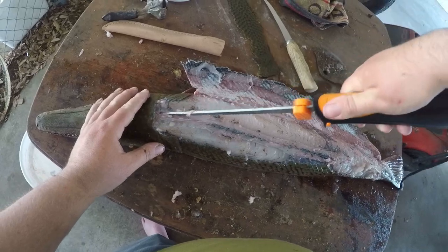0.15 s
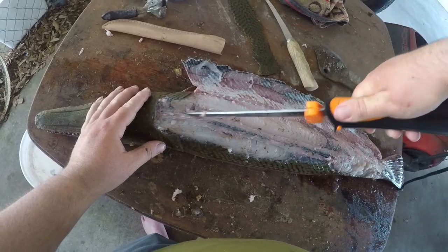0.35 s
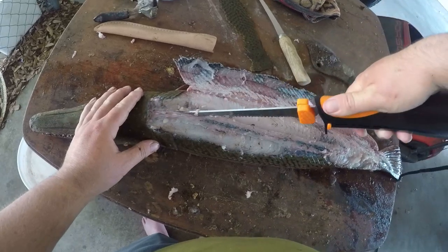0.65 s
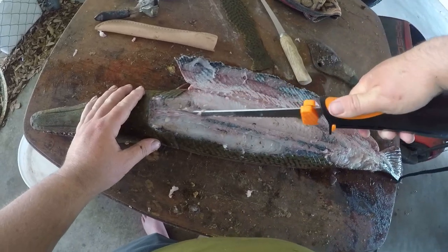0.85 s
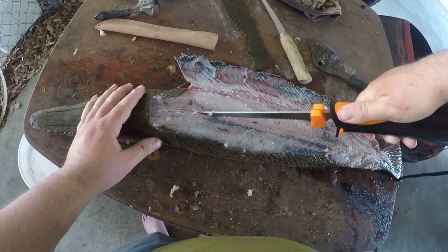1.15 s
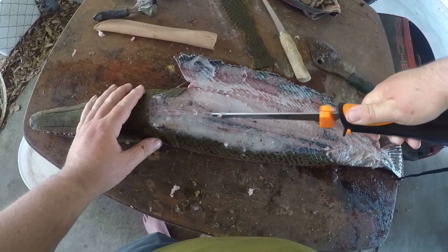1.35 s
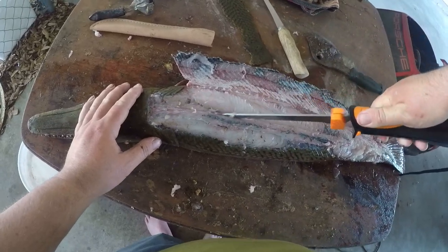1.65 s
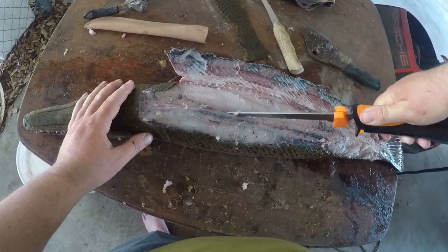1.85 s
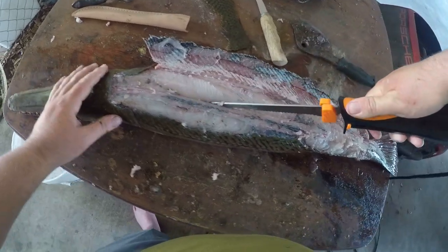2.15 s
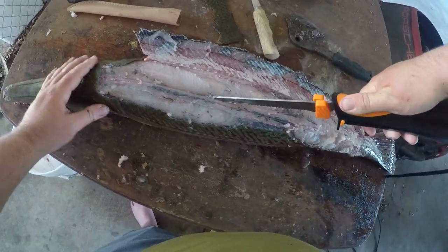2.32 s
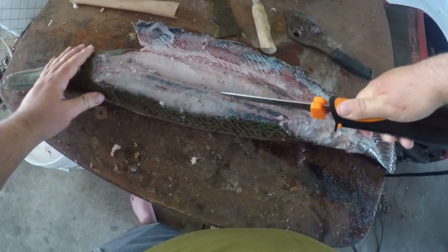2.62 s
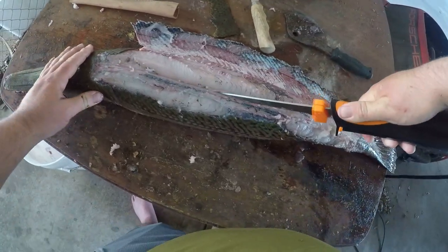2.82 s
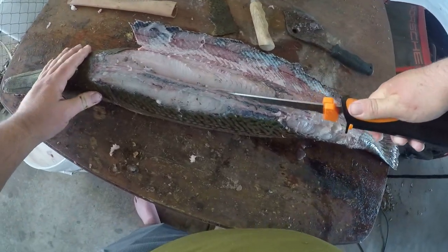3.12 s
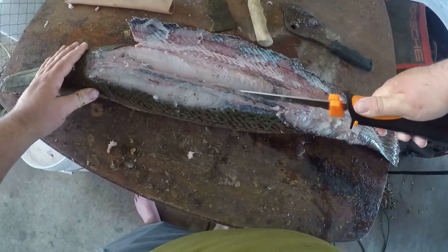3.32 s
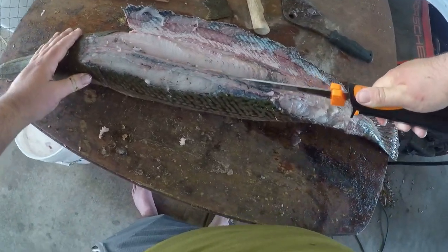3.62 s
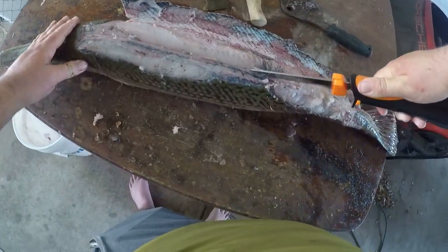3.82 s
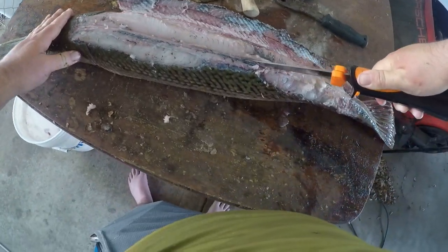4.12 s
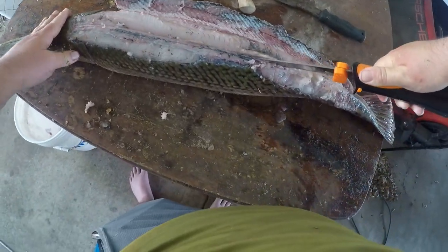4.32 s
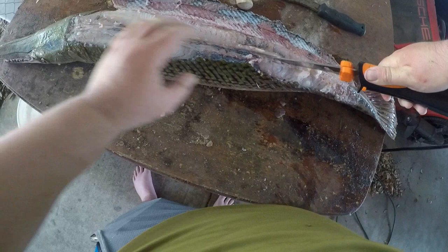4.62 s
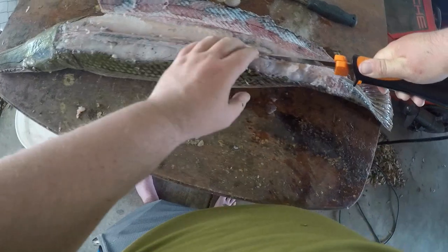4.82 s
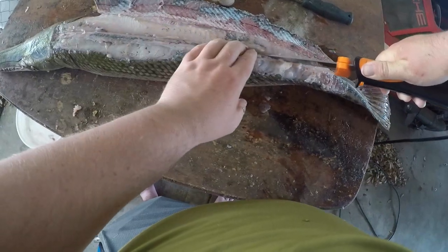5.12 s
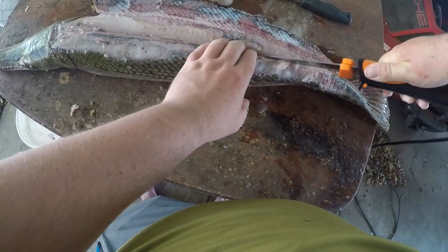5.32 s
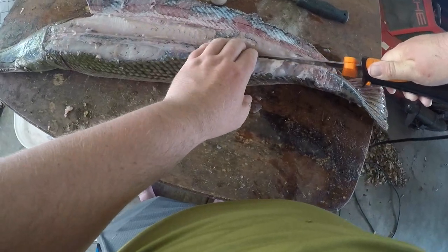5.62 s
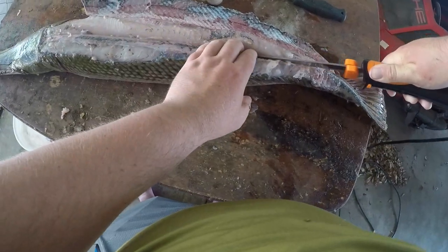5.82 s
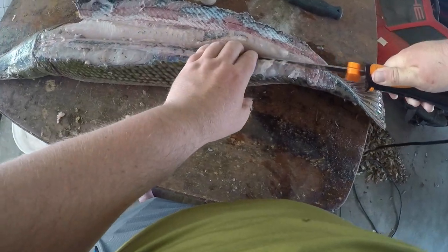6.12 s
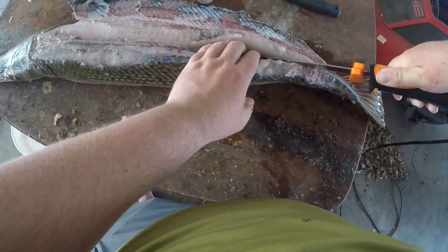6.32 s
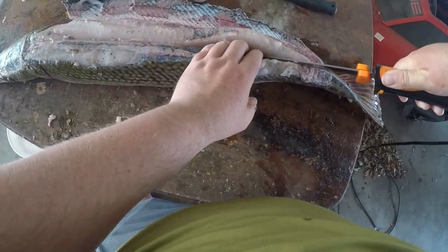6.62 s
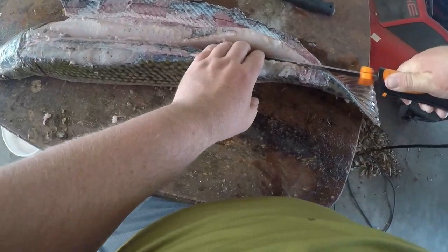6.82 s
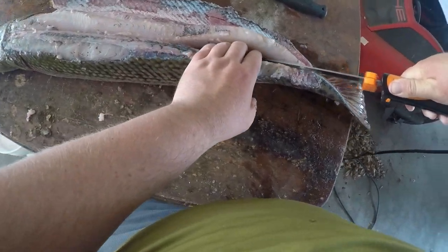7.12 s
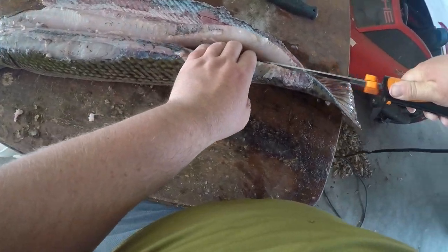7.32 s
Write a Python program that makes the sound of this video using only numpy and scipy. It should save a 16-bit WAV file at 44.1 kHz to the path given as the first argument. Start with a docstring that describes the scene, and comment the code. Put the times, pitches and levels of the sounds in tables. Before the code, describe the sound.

An electric knife is already running close to a stereo microphone: a rapid metallic chatter and bright rasp, a hollow buzzing handle, thin motor whine and low, throbbing rumble. At about 0.45 s the motor eases off; the buzz drops and loosens into separate knocks, one stronger at 0.54 s, with short high squeaks at 0.66 and 0.71 s. A sharp click at 0.79 s restarts it, with a quick rough upward chirp. It runs steadily until about 2.0 s, then winds down further, squeaking between 2.3 and 2.4 s before a louder snap at 2.45 s and a straining gear chirp. From 2.6 s it hums without a break, the blade ring growing thicker and slightly higher as flesh grips it. From about 5 s pressure deepens the low throb; faint wet ticks peak near 6.5 s, and the speed sags slightly while sawing continues to the end.

```python
"""Electric fillet knife, close

A large fish on a table, an electric knife sawing along it, stereo microphone ports of a camera close by.
A crank shuttles two serrated blades: steel clashes and rasps, the drive knocks and the motor whines.
The handle sways over a low rumble. Twice the motor runs down, the slow blades squeak and a click restarts it.
Impulses timed by the crank ring resonances; its harmonics give buzz and whine, shaped noise gives the rest."""
import sys
import numpy as np
from scipy import signal
from scipy.fft import rfft, irfft
from scipy.io import wavfile
from scipy.ndimage import uniform_filter1d

SR = 44100
rng = np.random.default_rng(int(sys.argv[2]) if len(sys.argv) > 2 else 0)


def transcribe(signal):
    """Save signal, clipped to [-1, 1], as a 16-bit WAV file at the path in sys.argv[1]."""
    frames = np.atleast_2d(signal).T
    limited = np.clip(frames, -1, 1)
    pcm = np.round(limited * 32767).astype(np.int16)
    wavfile.write(sys.argv[1], SR, pcm)


N = 328633
TIME = np.arange(N) / SR
BINS = np.fft.rfftfreq(N, 1 / SR)

# Speed that the motor holds under its load: t/s, crank rate/(turns/s)
RUNNING_SPEED = [(0, 28.48), (.5, 30.02), (1.25, 29.45), (1.6, 29.95), (2.06, 31.19), (2.9, 29.64),
                 (3.3, 29.94), (4.1, 29.15), (5.1, 29.1), (5.5, 28.99), (5.9, 29.04), (6.7, 28.43),
                 (7.45, 28.27)]
# Trigger let go: eased off t/s, pulled again t/s, run-down time/s, steepness of run-down, run-up time/s
PAUSES = [(.452, .7935, .225, 1.163, .121), (1.981, 2.42, .332, 2.782, .117)]
# Drag of the flesh on the blades: t/s, drag/(0-1)
DRAG = [(0, 0.16), (.9, 0.13), (2.2, 0.14), (2.6, 0.05), (2.95, 0.26), (3.6, 0.45), (4.4, 0.82),
        (7.45, 0.9)]
# Free hand pressing on the fillet above the blades: t/s, pressure/(0-1)
PRESS = [(4.5, 0), (5.0, 0.9), (6.2, 1), (6.6, 0.97), (7.3, 0.1)]
# Blades binding before each restart: t/s, gain of rubbing and knocking/dB
BINDING = [(.64, 0), (.7, -3), (.735, -3), (.745, -8), (.791, -8), (.7936, 0), (2.39, 0), (2.415, -4),
           (2.435, -3), (2.45, 0)]

# Blade against blade: place in the turn/(0-1), strength running light, strength deep in the flesh
CLASHES = [(.03, .03, .14), (.18, .3, .42), (.3, .6, .4), (.345, .25, .3), (.505, .2, .23),
           (.695, .33, .34), (.89, .33, .27)]
# Colour of the steel: f/Hz, relative level/dB
STEEL_COLOUR = [(590, -26.5), (1000, -1), (1160, -7), (1410, 1), (1730, -6.5), (1990, -5), (2710, -8),
                (3610, -2), (4010, -4), (4920, -4), (6120, 1), (7530, -3), (9040, -12), (14000, -22),
                (15500, -113)]
# Blade resonances, damped in the flesh: f/Hz, width/Hz, boost running light/dB, boost gripped/dB
STEEL_MODES = [(2420, 740, 7, 1), (3090, 460, 4, 3.5), (6630, 920, 3.5, 1.5), (7580, 580, 5, 5.5)]
# Reversals bending the blades, most on the push: place in the turn/(0-1), signed strength
FLEXES = [(.16, 0.32), (.67, -0.56)]
# Ring of the flat of the blade at full speed, before torque: t/s, low ring level/dB, high ring level/dB
RINGS = [(0, -52, -35), (.5, -52, -33), (1.3, -67, -40), (2.1, -47, -39), (2.95, -35, -58),
         (4.4, -30.5, -34.5), (5.1, -31, -29.5), (6.1, -33.5, -38.5), (7.3, -38, -30)]

# Knocks in the drive: place in the turn/(0-1), signed strength
KNOCKS = [(.21, 0.05), (0.73, -0.17)]
# Drag at which the blades run light, cut, and are gripped: drag/(0-1)
BUZZ_DRAG = [.08, .3, .88]
# Buzz of the drive: multiple of the crank rate, then relative level/dB running light, cutting, gripped
BUZZ = [(3, -44, -50, -55), (4, -34.5, -41, -36.5), (5, -39, -41, -34.5), (6, -36, -43.5, -46),
        (7, -46.5, -43.5, -35), (8, -38.5, -36, -42.0), (9, -59, -39.5, -41), (10, -40.5, -43, -45.5),
        (11, -45, -43.5, -38), (12, -45, -39, -45.5), (13, -60, -38, -43), (14, -35, -41, -40.5),
        (15, -44, -41, -38), (16, -39.5, -53, -59), (17, -46, -45.5, -42), (18, -49, -53, -54),
        (19, -47.5, -39, -42.5), (20, -43, -47, -48), (21, -46, -44.0, -42.5), (22, -44, -54, -46),
        (23, -48, -51.5, -49), (24, -48, -56, -50)]
# Colour of the housing: f/Hz, relative level/dB
HOUSING_COLOUR = [(60, -26), (100, -1), (170, -10), (330, -2.5), (450, -2), (650, -5), (850, 0),
                  (1050, -7.5), (1400, -8.5), (1750, -15), (2400, -5.5), (3200, -15), (4500, -51)]
# Housing resonances: f/Hz, width/Hz, boost/dB
HOUSING_MODES = [(100.86, 4, 12.5), (823, 62, 6)]
# Slow rise and fall of the housing level: t/s, trim/dB
HOUSING_LEVEL = [(0, 0.5), (1.8, 0), (2.9, 2), (3.8, 0.5), (6.2, 0.2), (7.4, -1.5)]

# Yoke striking the hollow shell at both ends of its travel: place in the turn/(0-1), strength
YOKE = [(.2, 1), (.7, .5)]
# Ring of the shell at full speed: t/s, level/dB
SHELL_LEVEL = [(0, -27.5), (.5, -32), (1.05, -28.5), (1.7, -36), (2.15, -32), (2.7, -29.5), (3.5, -36),
               (4.6, -32.5), (7.3, -34)]

# Motor and gear lines at full power and speed: multiple of the crank rate, level/dB
WHINE = [(3.45, -53), (62.5, -57), (66.67, -40.5), (70.83, -43.5), (133.33, -45), (258.33, -47),
         (266.67, -41)]
# Gearbox resonances that the straining motor sweeps through: f/Hz, width/Hz, relative level/dB
GEARBOX = [(1500, 200, -26.5), (2420, 200, -35), (3240, 290, -26)]

# Squeaks of slow blades and straining gears: t/s, length/s, level/dB, first f/Hz, last f/Hz, width/Hz
SQUEAKS = [(0.656, 0.012, -29, 8000, 6300, 1200), (0.711, 0.024, -26, 7640, 6660, 1100),
           (.807, 0.024, -38, 7000, 6700, 1200), (2.303, 0.012, -26, 7650, 6600, 1200),
           (2.347, 0.017, -25, 7500, 6200, 1200), (2.39, 0.03, -37, 10000, 10400, 1300),
           (2.412, 0.019, -20.5, 7350, 6760, 1090), (2.502, 0.022, -19.5, 2440, 2560, 130)]
# Drive snapping into gear on each restart: t/s, level at onset/dB
STARTS = [(0.7936, -16), (2.4522, -14)]
# Chirps and snaps deep in the tail: t/s, level/dB
TEARING = [(5.0, -51), (5.8, -44), (6.5, -36.5), (7.45, -48)]

# Sway of the handle at full speed, before torque: t/s, level/dB
SWAY = [(0, -16.5), (.55, -14), (1.0, -8), (1.3, -18), (2.85, -15.5), (3.2, -22), (5.1, -21.5),
        (6.15, -27.5), (7.1, -23)]
# Colour of the low rumble: f/Hz, relative level/dB
RUMBLE_COLOUR = [(10, -12.5), (20, 2), (45, 2), (100, -6), (150, -12.5), (300, -18.5), (1000, -50),
                 (15000, -53)]

# Level difference of the two ports: f/Hz, left minus right/dB
PORT_BALANCE = [(60, -1), (200, -1), (480, -4.5), (770, -13.5), (1170, -7), (1800, 3.5), (2750, -1),
                (4200, -3.5), (6400, 1.5), (9800, -3), (15000, 2)]
# Phase between the ports: f/Hz, lead of the left/rad
PORT_PHASE = [(500, 0), (750, -1.2), (950, -3.6), (1400, -4.9), (2100, -6.3)]
# Likeness of noise at the two ports: f/Hz, correlation/(0-1)
LIKENESS = [(30, .1), (130, .55), (300, .93), (1500, .8), (3000, .7), (6000, .5), (9000, .2), (15000, .05)]

REBOUND, REBOUND_TURNS = .85, .13  # strength relative to the knock, delay in turns
SHELL_HZ, SHELL_WIDTH_HZ = 831.5, 148
# one early knock of the drive during the first run-down rings the housing
KNOCK_S, KNOCK_DB, KNOCK_DECAY_S, KNOCK_HZ = .537, -14, 0.0072, 850
UNLOADING = .3  # share of the torque that drops off the gears while they hang slack
TAKE_UP_S = 0.0018  # time for the gears to take up the torque
EDGE_HZ = 15300  # upper band limit


def amp(db):
    """Decibels to gain."""
    return 10 ** (np.asarray(db) / 20)


def curve(rows, column=1):
    """One column of a time table, at every sample."""
    rows = np.asarray(rows)
    return np.interp(TIME, rows[:, 0], rows[:, column])


def read(points, hz):
    """A spectrum table on a log-frequency axis."""
    f, value = np.transpose(points)
    return np.interp(np.log(hz + 1), np.log(f + 1), value)


def evened(x, size=N):
    """Scales to rms 1 over a sliding window of size samples."""
    power = np.atleast_2d(x ** 2).mean(0)
    return x / np.sqrt(abs(uniform_filter1d(power, size)) + 1e-14)


def wander(rate_hz):
    """Random wander of rms 1, mostly slower than rate_hz."""
    spectrum = rfft(rng.standard_normal(N)) / (1 + (BINS / rate_hz) ** 4)
    return evened(irfft(spectrum, N))


def noise_pair():
    """White noise at two ports, as alike as the likeness table says."""
    a, b = rfft(rng.standard_normal((2, N)))
    same = np.clip(read(LIKENESS, BINS), -1, 1)
    return irfft(np.array([a, same * a + np.sqrt(1 - same ** 2) * b]), N)


def body(x, spectrum, modes, size=8192):
    """Causal filter with a broad colour and a few resonances on top."""
    hz = abs(np.fft.fftfreq(size, 1 / SR))
    peaks = sum(boost / (1 + (2 * (hz - f) / width) ** 2) for f, width, boost in modes)
    log_gain = np.log(amp(np.maximum(read(spectrum, hz) + peaks, -100)))
    # minimum phase: the ring starts at once
    ring = np.fft.ifft(np.exp(np.conj(signal.hilbert(log_gain)))).real[:size // 2]
    return signal.oaconvolve(np.atleast_2d(x), ring[None], axes=1)[:, :N]


def resonate(x, hz, width):
    """A resonance of about unit gain at its peak, fixed or moving."""
    turn = np.exp(2j * np.pi * np.cumsum(hz * np.ones(x.shape[-1])) / SR)
    r = np.exp(-np.pi * abs(width) / SR)
    return 2 * (turn * signal.lfilter([1 - r], [1, -r], x / turn)).real


def resonate_twice(x, hz, width):
    """Two equal resonances in a row, for steeper skirts."""
    return resonate(resonate(x, hz, width), hz, width)


def fading(x, life):
    """Each impulse dies away exponentially, with time constant life in seconds."""
    return signal.lfilter([1], [1, -np.exp(-1 / (abs(life) * SR))], x)


def add(mix, s, sound):
    """Mixes a sound in at time s."""
    part = mix[:, round(s * SR):][:, :sound.shape[-1]]
    part += sound[..., :part.shape[1]]


def blows(turns, places, spread_db, jitter):
    """Impulses at fixed places in each crank turn, uneven in size (dB) and time (s)."""
    out, whole = np.zeros(N), np.arange(np.floor(turns[-1]) + 1)
    for place, strength in places:
        size, late = rng.standard_normal((256, 2))[:len(whole)].T
        moment = np.interp(whole + place, turns, TIME, -1, -1) + jitter * late
        at = np.round(moment * SR).astype(int)
        inside = (at >= 0) & (at < N)
        out[at[inside]] += (strength * amp(spread_db * size))[inside]
    return out


def scatter(x, wet_db, life, size=1500):
    """Dense early reflections from the handle, hands and table."""
    t = np.arange(size) / SR
    taps = rng.standard_normal(size) * np.exp(-t / life) * (t > .001)
    return x + amp(wet_db) * signal.oaconvolve(x, taps / np.linalg.norm(taps))[:N]


def trigger():
    """Share of the running speed, and motor torque: the motor runs down in a pause, then pulls back up."""
    spin, torque = np.ones(N), np.zeros(N)
    for eased, pulled, run_down, steepness, run_up in PAUSES:
        coasted = np.clip(TIME - eased, 0, pulled - eased)
        driven = np.maximum(TIME - pulled, 0)
        lost = (1 - np.exp(-(coasted / run_down) ** steepness)) * np.exp(-driven / run_up)
        spin *= 1 - lost
        torque += lost * (1 - np.exp(-driven / TAKE_UP_S))
    slack = (TIME > KNOCK_S) & (TIME < STARTS[0][0])
    return spin, torque - UNLOADING * uniform_filter1d(slack * 1., size=200)


def level(db, speed_power, torque_db=0, drag_db=0, press_db=0):
    """Gain of a part: a power of the speed, plus so many dB at full torque, full drag and full hand pressure."""
    spin, torque = trigger()
    load_db = torque_db * torque + drag_db * curve(DRAG) + press_db * curve(PRESS)
    return spin ** speed_power * amp(db + load_db)


def sliding():
    """Gain of blade, drive and shell contact, which falls as the blades bind."""
    return amp(curve(BINDING))


def blades(turns):
    """Steel clashes on steel within each stroke, over a steady rasp of sliding teeth."""
    place, light, deep = np.transpose(CLASHES)
    free = blows(turns, zip(place, light), spread_db=1.2, jitter=.00008)
    gripped = blows(turns, zip(place, deep), spread_db=1.6, jitter=.00008)
    hits = free + np.clip(curve(DRAG), 0, 1) * (gripped - free)
    contact = fading(hits, life=.0014) * 1.2 + .28  # the constant is the rasp
    grit = amp(.9 * wander(400))
    push = noise_pair() * contact * grit + 1.6 * scatter(hits, wet_db=9, life=.002)
    ringing = body(push, STEEL_COLOUR, [(hz, width, db) for hz, width, db, _ in STEEL_MODES])
    damped = body(push, STEEL_COLOUR, [(hz, width, db) for hz, width, _, db in STEEL_MODES])
    clatter = ringing + curve(DRAG) * (damped - ringing)
    gain = level(db=-21.0, speed_power=1.14, torque_db=4.0, drag_db=-0.58, press_db=0.45)
    return evened(clatter, size=4400) * gain


def blade_rings(turns):
    """The reversals also ring two bending modes of the blades; the lower rises as the flesh grips."""
    hits = blows(turns, FLEXES, spread_db=1.1, jitter=.00002)
    scrape = evened(noise_pair() * (fading(abs(hits), life=.006) + .15))
    push = evened(scatter(hits, wet_db=-3.0, life=0.006)) + .55 * scrape
    low = resonate_twice(push, hz=1200 + 235 * curve(DRAG), width=200)
    high = resonate_twice(push, hz=3610, width=330)
    low_gain = level(db=curve(RINGS), speed_power=3.2, torque_db=18)
    high_gain = level(db=curve(RINGS, column=2), speed_power=5.2)
    return evened(low, size=4400) * low_gain + evened(high, size=4400) * high_gain


def drive(turns, speed):
    """Crank harmonics phased as a knock and rebound buzz with the drag, over single knocks and a noisy rattle."""
    drag = curve(DRAG)
    angle = 2 * np.pi * (turns - .22 + .001 * wander(20))
    wobbles = [amp(.7 * wander(3.9)) for _ in range(5)]
    buzz = np.zeros(N)
    for (multiple, *levels), lag in zip(BUZZ, rng.standard_normal(len(BUZZ))):
        k = round(multiple)
        rebound = np.angle(1 + REBOUND * np.exp(-2j * np.pi * k * REBOUND_TURNS))
        # odd harmonics in quadrature give a knock at both ends of the stroke
        partial = np.cos(k * angle + k % 2 * np.pi / 2 + rebound + .6 * lag)
        buzz += amp(np.interp(drag, BUZZ_DRAG, levels)) * wobbles[k % len(wobbles)] * partial
    # at low speed the buzz falls apart into single knocks on the housing
    tight = np.clip((speed - 21) / 6, 0, 1)
    hits = blows(turns, KNOCKS, spread_db=3.5, jitter=.00008)
    knocks = body(scatter(hits, wet_db=4.0, life=0.004), HOUSING_COLOUR, HOUSING_MODES)
    loose = evened(noise_pair() * (fading(abs(hits), life=.004) + .15))
    rattle = evened(body(loose, HOUSING_COLOUR, HOUSING_MODES), size=4400)
    tonal = evened(buzz) * tight + evened(knocks, size=4400) * np.sqrt(1 - tight ** 2)
    tonal_gain = level(db=-28.5, speed_power=1.36, torque_db=5, drag_db=0.6)
    rattle_gain = level(db=-29.0, speed_power=0.98, torque_db=6.5, drag_db=-2.5)
    return amp(curve(HOUSING_LEVEL)) * (tonal * tonal_gain + rattle * rattle_gain)


def shell(turns):
    """Each end of the stroke rings the shell of the handle at one fixed pitch, whatever the speed."""
    hits = blows(turns, YOKE, spread_db=.7, jitter=.00002)
    ring = resonate_twice(hits, SHELL_HZ, SHELL_WIDTH_HZ)
    return evened(ring) * level(db=curve(SHELL_LEVEL), speed_power=1.6)


def motor(turns, speed):
    """Commutator and gear lines waver while the power is on; each run-up strains the gears into a rough chirp."""
    gain_rate = uniform_filter1d(np.gradient(speed) * SR, 900)  # turns per second, each second
    power = np.clip(1 + gain_rate / 25, 0, 1) * (speed / speed.max()) ** 0.28
    lines = np.zeros(N)
    for k, db in WHINE:
        waver = 1 + 0.064 * wander(23)
        lines += amp(db) * waver * np.cos(2 * np.pi * k * turns + 0.33 * wander(2.1))
    mesh = sum(np.cos(2 * np.pi * k * turns + .85 * wander(150)) for k in (66.67, 133.33, 141.67))
    effort = np.clip(gain_rate / 90, 0, 1) ** 1.5 * np.clip(speed / 17, 0, 1) ** 4
    strain = mesh * effort * amp(3 * wander(60))
    chirp = sum(amp(db) * resonate_twice(strain, hz, width) for hz, width, db in GEARBOX)
    return np.sqrt(2) * (lines * power + chirp)


def stops():
    """Slow blades stick and squeak with a faint octave, restarts click; one early drive knock rings the housing."""
    out = np.zeros((2, N))
    for s, length, db, first_hz, last_hz, width in SQUEAKS:
        count = max(round(length * SR), 20)
        hz, rub = np.geomspace(first_hz, last_hz, count), rng.standard_normal((2, count))
        tone = evened(resonate_twice(rub, hz, width))
        octave = evened(resonate_twice(rub, 2 * hz, width))
        add(out, s, amp(db) * (tone + amp(-17) * octave) * signal.windows.tukey(count, .5))
    t = np.arange(SR // 20) / SR
    for s, db in STARTS:
        snap = evened(resonate(rng.standard_normal((2, len(t))), hz=6600, width=300))
        add(out, s, amp(db) * snap * np.exp(-t / 0.004))
    knock = np.sin(2 * np.pi * KNOCK_HZ * t)
    add(out, KNOCK_S, amp(KNOCK_DB) * knock * np.exp(-t / KNOCK_DECAY_S))
    return out


def tearing(turns):
    """Deep in the tail the blades give one thin chirp a turn, among tiny wet snaps of the flesh."""
    chirps = fading(blows(turns, [(.04, 1)], spread_db=4, jitter=.0006), life=.002)
    snaps = (rng.random(N) < 200 / SR) * rng.exponential(.35, N)  # about 200 a second
    ticks = noise_pair() * (chirps + fading(snaps, life=0.0042))
    return evened(resonate_twice(ticks, hz=10200, width=2000)) * amp(curve(TEARING))


def handle(turns):
    """The shuttling blades sway the handle twice a turn and rock it once a turn, harder when pressed down."""
    flutter = np.array([wander(8.8), wander(3.2)])
    sway_gain = level(db=curve(SWAY), speed_power=3.1, torque_db=-22)
    sway = sway_gain * np.cos(4 * np.pi * turns) * (1 + 0.23 * flutter)
    drift = np.array([wander(2.1), wander(2.0)])
    rocking = np.cos(2 * np.pi * (turns + .35) + .7 * drift)
    rock = level(db=-39.5, speed_power=0.27, press_db=15.0) * rocking
    return np.sqrt(2) * (sway + rock)


def rumble():
    """Low noise coloured by the housing resonances, its level flickering, nearly the same at any speed."""
    noise = evened(body(noise_pair(), RUMBLE_COLOUR, HOUSING_MODES))
    return noise * amp(1.4 * wander(11)) * level(db=-22.5, speed_power=0.042, press_db=1.0)


def scene():
    """The turning crank times the knife; stops, snaps and rumble join it."""
    spin, _ = trigger()
    speed = curve(RUNNING_SPEED) * spin
    turns = np.cumsum(speed) / SR - 1 / 4
    cutting = (blades(turns) + blade_rings(turns)) * sliding() + tearing(turns) + stops()
    machine = (drive(turns, speed) + shell(turns)) * sliding() + motor(turns, speed)
    return cutting + machine + handle(turns) + rumble()


def record(dry):
    """Two microphone ports on different faces of the camera, then the band limit."""
    lean = amp(read(PORT_BALANCE, BINS) / 2)
    ports = np.array([lean * np.exp(1j * read(PORT_PHASE, BINS)), 1 / lean])
    ports /= np.maximum(abs(ports.mean(0)), .45)  # keeps the sum level unless the ports nearly cancel
    heard = irfft(rfft(dry) * ports, N)
    low_pass = signal.firwin(401, EDGE_HZ, window=("kaiser", 9), fs=SR)
    return signal.oaconvolve(heard, low_pass[None], "same")


dry = scene()
out = record(dry)
transcribe(out)
```